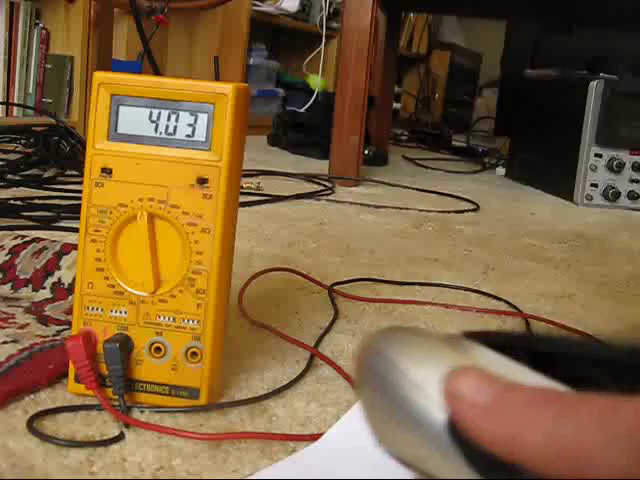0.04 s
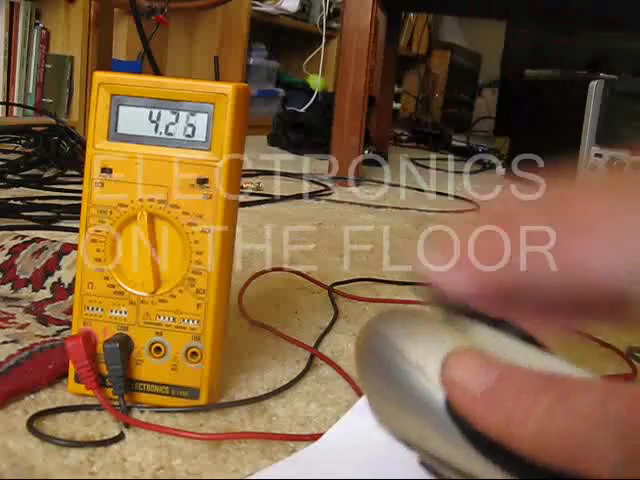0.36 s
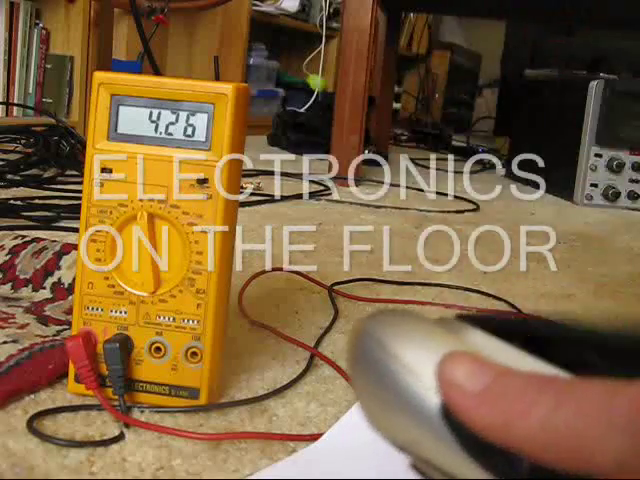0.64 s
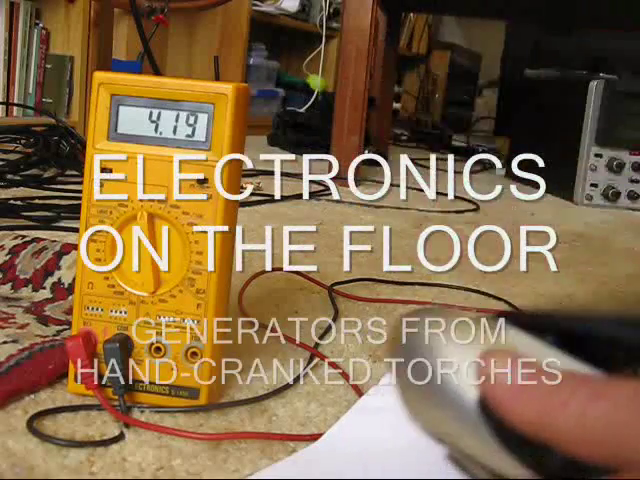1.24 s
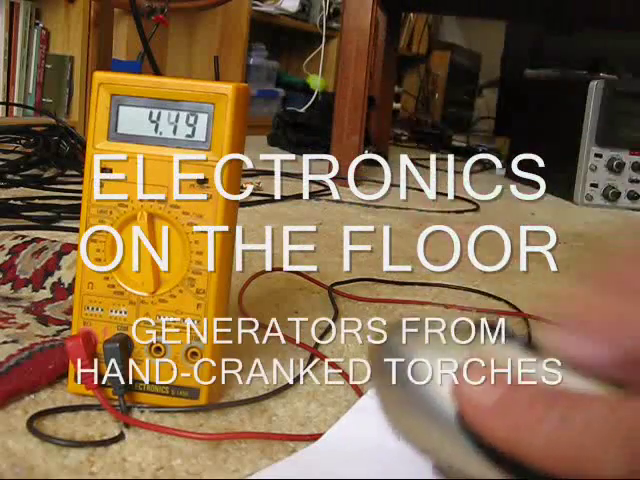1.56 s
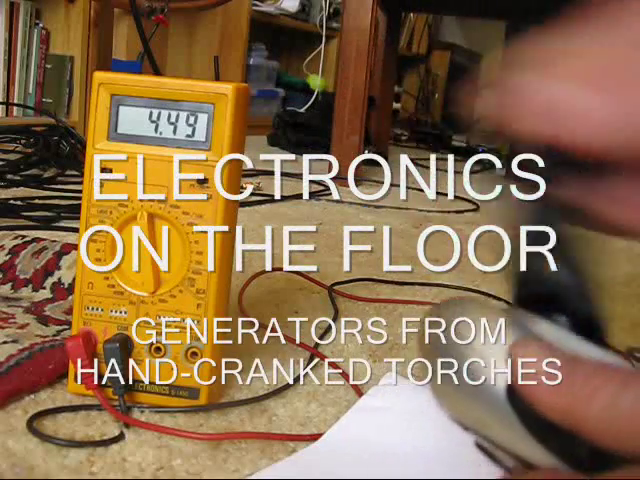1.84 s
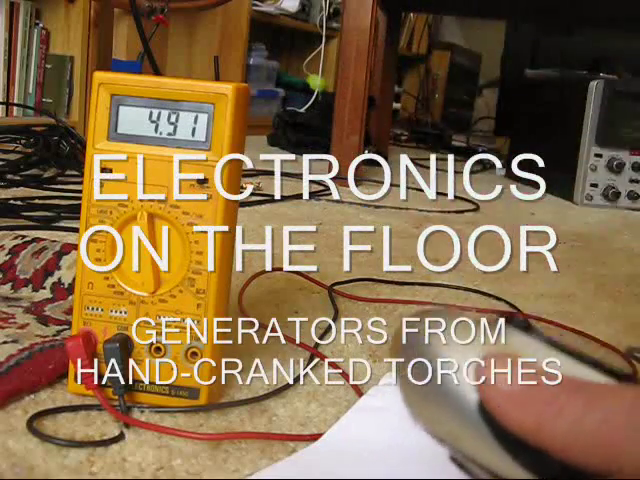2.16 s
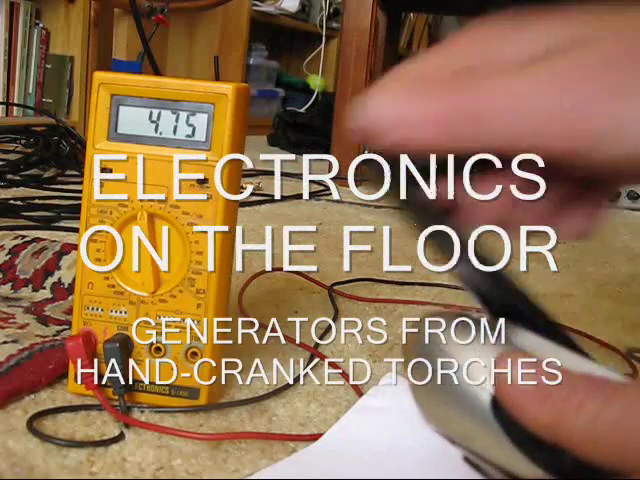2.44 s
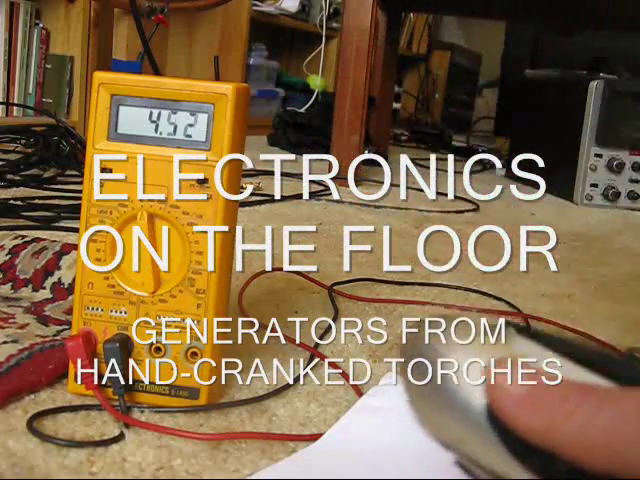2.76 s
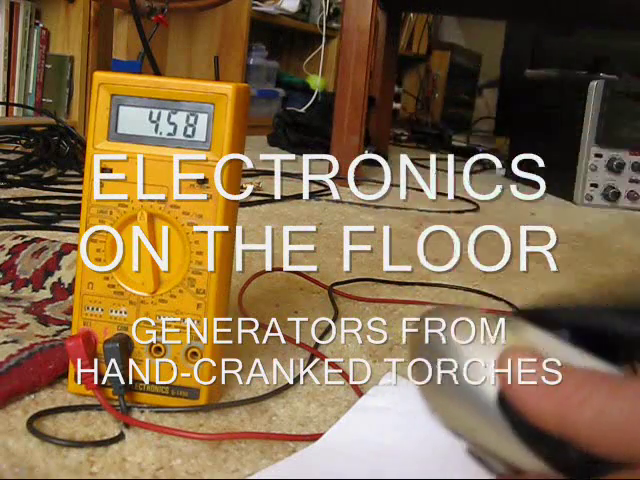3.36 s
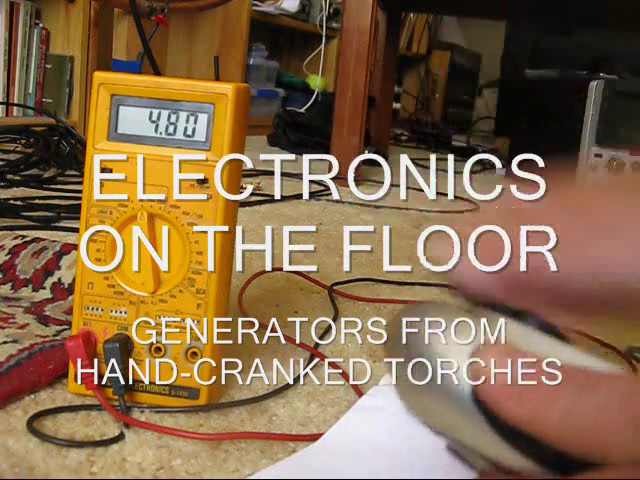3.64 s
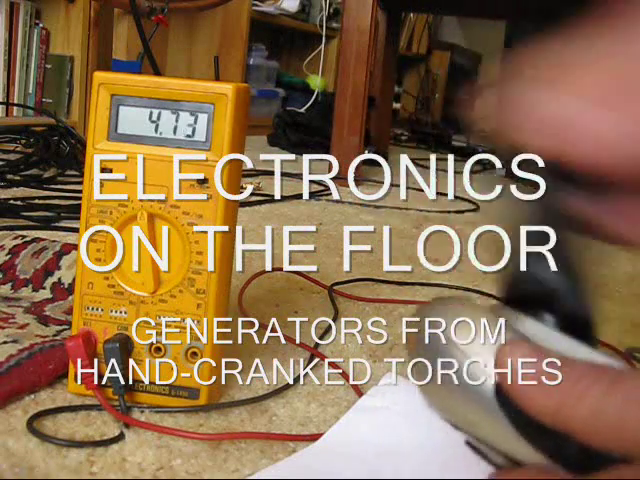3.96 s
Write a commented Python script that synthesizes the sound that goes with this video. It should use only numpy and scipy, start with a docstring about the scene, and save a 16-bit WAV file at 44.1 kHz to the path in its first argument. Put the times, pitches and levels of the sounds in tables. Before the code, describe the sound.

A hand-cranked torch being wound, its plastic gears whirring with a wavering whine.

```python
"""A hand-cranked torch is wound indoors, close to a small camera, about two turns a second.
At 0.13 s it cuts in at full swing: plastic gears whine and chatter through the case over a low grind.
From then on the pitch sags once per crank turn, and the slack gears rattle and scrape as they slow.
Tooth snaps, dry squeals and soft bumps in the hand come now and then to the end, over a faint hum.
Throughout, the camera samples coarsely and holds each sample, mirroring the whirr into the treble."""
import sys
import numpy as np
from scipy import signal
from scipy.fft import rfft, irfft, next_fast_len
from scipy.io import wavfile
from scipy.ndimage import uniform_filter1d, map_coordinates

SR = 44100
rng = np.random.default_rng(int(sys.argv[2]) if len(sys.argv) > 2 else 0)


def transcribe(u):
    """Save the signal u as a 16-bit wav file named by the first command-line argument.

    u: samples, shape (n,) or (channels, n), limited to [-1, 1]; the rate is SR.
    q: integer samples, one column per channel.
    """
    v = np.clip(np.atleast_2d(u).T, -1, 1)
    q = np.round(v * 32767).astype(np.int16)
    wavfile.write(sys.argv[1], SR, q)


N = 176400
WHINE_ORDER, PINION_TEETH, WHEEL_TEETH, WHEEL_PINION_TEETH = 16, 8, 43, 12

# Whine pitch, 16 x dynamo rotor rate: t/s, f/Hz
WHINE_PITCH = [(0.12, 2500), (0.207, 2158), (0.339, 2598), (0.428, 2685), (0.503, 2553), (0.617, 2641),
               (0.677, 2720), (0.736, 2386), (0.823, 2117), (0.907, 2523), (1.02, 2770), (1.125, 2655),
               (1.248, 2866), (1.283, 2864), (1.325, 2642), (1.414, 2543), (1.509, 2988), (1.601, 3154),
               (1.683, 2994), (1.784, 3147), (1.837, 2814), (1.878, 2533), (1.996, 2819), (2.055, 3038),
               (2.215, 2897), (2.3, 3129), (2.343, 2887), (2.399, 2442), (2.531, 2790), (2.618, 2992),
               (2.724, 2824), (2.783, 2993), (2.83, 3136), (2.904, 2721), (2.946, 2434), (3.06, 2780),
               (3.166, 3087), (3.254, 2909), (3.36, 3035), (3.42, 2755), (3.517, 2470), (3.61, 2947),
               (3.665, 3162), (3.767, 2786), (3.838, 2829), (3.941, 2860), (4.0, 2476)]
def gear_train():
    """One speed drives every gear; rotor and wheel angles in turns."""
    whine_hz = glide(WHINE_PITCH)
    rotor = np.cumsum(whine_hz) / SR / WHINE_ORDER
    wheel = rotor * PINION_TEETH / WHEEL_TEETH
    return whine_hz, rotor, wheel


# Main whine envelope: t/s, level/dB
WHINE_LEVEL = [(0.13, -34.5), (0.31, -30), (0.37, -35.5), (0.52, -27.5), (0.69, -39.7), (0.76, -30.4),
               (0.82, -37), (0.91, -30.5), (0.97, -42), (1.2, -30), (1.32, -39.7), (1.35, -28), (1.47, -42),
               (1.5, -28), (1.58, -36.5), (1.63, -54), (1.71, -29), (1.83, -37), (1.9, -29.5),
               (1.98, -35.5), (2.13, -42), (2.24, -30.5), (2.36, -39), (2.41, -28.5), (2.46, -30.5),
               (2.54, -36), (2.65, -42), (2.69, -36.5), (2.87, -32.5), (2.91, -41), (2.96, -26.5),
               (3.07, -39), (3.2, -40), (3.32, -31), (3.42, -40), (3.47, -30.5), (3.52, -29), (3.58, -40),
               (3.62, -31), (3.7, -35.5), (3.73, -47), (3.77, -33.5), (3.88, -35.5), (3.97, -41.2)]
def main_whine(rotor, whine_hz):
    """Whine roughened by uneven teeth, with a side tone below and an overtone that flares in the case."""
    def partial(order, jitter_rad):
        gain = amp(1.1 * wobble(rate_hz=130))
        return unit(gain * np.sin(2 * np.pi * order * rotor + jitter_rad * wobble(rate_hz=400)))

    upper_order = 3 * PINION_TEETH
    flare = resonance(whine_hz * upper_order / WHINE_ORDER, centre_hz=3750, half_width_hz=170)
    voice = partial(WHINE_ORDER, jitter_rad=0.3)
    voice += amp(-7) * partial(WHINE_ORDER - 1, jitter_rad=0.3)
    voice += amp(-8.5) * flare * partial(upper_order, jitter_rad=1.1)
    return amp(curve(WHINE_LEVEL) - 0.2 + 1.3 * wobble(rate_hz=40)) * voice


# Mesh envelope, set by the push on the crank: t/s, level/dB
LOAD = [(0.14, -32.5), (0.29, -24), (0.36, -31.5), (0.48, -25.5), (0.53, -29.5), (0.84, -32.5), (0.9, -26),
        (1.42, -31), (1.45, -28), (1.55, -29), (1.74, -26.5), (1.79, -31.0), (1.98, -28.5), (2.03, -29.5),
        (2.13, -24.5), (2.2, -30.5), (2.27, -27), (2.32, -33), (2.48, -29), (3.18, -30), (3.22, -27),
        (3.7, -32), (3.76, -28), (3.99, -31)]
# Dynamo shaft tones: multiple of shaft rate, level/dB
ROTOR_TONES = {6: -8, 7: -9, 10: -7, 11: -10, 15: -1, 17: -8, 19: -9}
# Driving wheel tones: multiple of shaft rate, level/dB
WHEEL_TONES = {36: -9, 42: -9, 50: -9, 58: -11, 62: -8, 64: -6, 68: -7, 72: -3, 74: -3, 92: -8}
# Plastic case response: f/Hz, level/dB
CASE_RESPONSE = [(100, -28.5), (800, -20), (1050, -11), (1190, -8.5), (1280, -6.5), (1380, -9.5),
                 (1530, -5.5), (1800, -6.5), (2100, -7.5), (2300, -3), (2520, 0.5), (2680, -6.5),
                 (2950, -3), (3200, -4), (3500, -9.5), (4200, -10.5), (5500, -10.5), (7000, -58)]
def gear_mesh(rotor, wheel):
    """Shaft tones, tooth contacts and rubbing, all ringing in the case."""
    tones = shaft_tones(rotor, ROTOR_TONES) + shaft_tones(wheel, WHEEL_TONES)
    teeth = tooth_clicks(wheel, WHEEL_TEETH, scatter_db=5, jitter_s=95e-6)
    mesh = amp(-4.5) * colour(tones, CASE_RESPONSE)
    mesh += amp(-6) * colour(teeth, CASE_RESPONSE)
    mesh += amp(-6.5) * colour(rubbing(rotor, depth=0.53), CASE_RESPONSE)
    return amp(curve(LOAD)) * mesh


def shaft_tones(turns, orders, flutter_db=3):
    """Multiples of a shaft's rate, each fluttering in level."""
    return sum(amp(db + flutter_db * wobble(rate_hz=50)) * np.sin(2 * np.pi * (k * turns + rng.random()))
               for k, db in orders.items())


def tooth_clicks(turns, teeth, scatter_db, jitter_s, uneven_db=2.5):
    """One click per contact: each tooth has its own strength, each contact random level and timing."""
    contact = np.arange(1, int(turns[-1] * teeth))
    strength = rng.standard_normal(teeth)
    timing, force = rng.standard_normal((len(contact), 2)).T
    due = np.interp(contact / teeth, turns, np.arange(N))
    at = np.clip(due + jitter_s * SR * timing, 0, N - 2)
    tooth_db = uneven_db * unit(strength - strength.mean())
    gain = amp(tooth_db[contact % teeth] + scatter_db * np.clip(force, -2, 2))
    i = at.astype(int)  # each click is split over two samples
    return unit(np.bincount(i, gain * (1 - at + i), N) + np.bincount(i + 1, gain * (at - i), N))


def rubbing(turns, depth):
    """Friction noise, swelling once per shaft turn."""
    return rng.standard_normal(N) * np.exp(depth * np.cos(2 * np.pi * turns))


def chatter(rotor, wheel, click_gain):
    """Clicks of the slower gear stage plus rotor friction."""
    teeth = tooth_clicks(wheel, WHEEL_PINION_TEETH, scatter_db=4.6, jitter_s=306e-6)
    return click_gain * teeth + unit(rubbing(rotor, depth=0.3))


# Scrape envelope: t/s, level/dB
SCRAPE_LEVEL = [(0.14, -27), (0.2, -37), (0.28, -31.5), (0.37, -34), (0.74, -28), (0.8, -36.5),
                (0.98, -30.5), (1.05, -40), (1.16, -31), (1.22, -35), (1.33, -29.5), (1.61, -37),
                (1.66, -33.5), (1.89, -28.5), (2.04, -34), (2.18, -31), (2.26, -33.5), (2.4, -27),
                (2.5, -32.5), (2.81, -35), (2.84, -29), (2.96, -31), (3.02, -34), (3.17, -33.5),
                (3.48, -29.5), (3.6, -36.5), (3.75, -38.5), (3.8, -28), (3.88, -38.5), (3.99, -26.5)]
# Scrape spectrum: f/Hz, level/dB
SCRAPE_SPECTRUM = [(300, -33), (1500, -11.5), (3000, -7.5), (4450, -3.5), (4700, 4.5), (4950, 0), (5450, 2),
                   (5800, -2.5), (6200, -52)]
def scrape(rotor, wheel):
    """Treble scraping of the gears, strongest as they slow."""
    gain = amp(curve(SCRAPE_LEVEL) - 0.37)
    return gain * colour(chatter(rotor, wheel, click_gain=0.58), SCRAPE_SPECTRUM)


# Rattle spectrum: f/Hz, level/dB
RATTLE_SPECTRUM = [(300, -29), (1000, -18), (2400, -6), (3050, -6), (3420, 6), (3600, 0.5), (3780, 2.5),
                   (4200, -4), (5500, -11), (7000, -63)]
def rattle(rotor, wheel, whine_hz, db_per_octave=-25.5):
    """Slack gears rattle in their play at the slow part of each turn."""
    mean_hz = uniform_filter1d(whine_hz, size=SR // 2)
    slack_db = -34.5 + db_per_octave * np.log2(whine_hz / mean_hz)
    return amp(slack_db) * colour(chatter(rotor, wheel, click_gain=0.8), RATTLE_SPECTRUM)


def low_whine(turns, order):
    """A lower gear tone; grows with the push and blooms in the case's lowest resonance."""
    hz = order * np.gradient(turns) * SR
    ring_db = 6.5 * resonance(hz, centre_hz=1286, half_width_hz=29)
    load_db = curve(LOAD)
    push_db = 0.7 * (load_db - load_db.mean())
    gain = amp(-43.5 + ring_db + push_db + 1.73 * wobble(rate_hz=35))
    return gain * unit(np.sin(2 * np.pi * order * turns + 0.24 * wobble(rate_hz=120)))


# Tooth snaps: t/s, peak level/dB
SNAPS = [(0.223, -15), (.7216, -18), (.7835, -14), (1.377, -15), (1.8264, -14), (2.3833, -16),
         (3.4489, -17)]
# Snap spectrum: f/Hz, level/dB
SNAP_SPECTRUM = [(500, -20), (3500, -2), (5500, 1), (6500, -46)]
def snaps():
    """Single teeth snap hard against the next."""
    blows = np.zeros(N)
    for at_s, db in SNAPS:
        blows[round(at_s * SR)] = amp(db)
    clicks = colour(blows, SNAP_SPECTRUM)
    return clicks * blows.max() / np.abs(clicks).max()


# Squeals: t/s, half length/s, f/Hz, level/dB
SQUEALS = [(0.264, .027, 3550, -35), (.635, .012, 2880, -31), (0.797, .06, 3430, -39),
           (1.16, 0.041, 4730, -36), (1.794, .014, 5400, -32), (1.991, .007, 3050, -29),
           (2.422, 0.034, 4690, -36), (2.86, .025, 5400, -38), (2.96, 0.027, 4700, -34),
           (3.4, .026, 5450, -37)]
def squeals(width_hz=220):
    """Dry plastic rubs; a narrow resonance flares and fades."""
    t = np.arange(N) / SR
    sound = np.zeros(N)
    for at_s, half_s, hz, db in SQUEALS:
        flutter = wobble(width_hz) + 1j * wobble(width_hz)
        ring = unit(np.real(flutter * np.exp(2j * np.pi * hz * t)))
        sound += amp(db) * swell(at_s, half_s) * ring
    return sound


# Grind envelope: t/s, level/dB
GRIND_LEVEL = [(0.14, -48.5), (0.44, -43), (0.51, -47.5), (0.67, -44.5), (0.71, -50), (0.88, -49.5),
               (0.94, -42.5), (1.34, -45.5), (1.39, -55.5), (1.46, -44), (1.93, -47.5), (1.98, -43.5),
               (2.38, -47.5), (2.43, -55), (2.52, -40), (2.64, -47), (2.75, -42), (2.8, -53.5), (2.91, -41),
               (2.96, -53), (3.07, -43), (3.39, -48), (3.44, -42.5), (3.5, -53), (3.57, -45.5), (3.86, -45),
               (3.89, -50.5), (3.99, -44)]
# Grind spectrum: f/Hz, level/dB
GRIND_SPECTRUM = [(20, -4.5), (60, -2.5), (140, -3.5), (220, -0.5), (360, -1.5), (520, 0), (800, -5.5),
                  (1200, -4), (3000, -61.5)]
def grind():
    """Lumpy low noise of the crank."""
    gain = amp(curve(GRIND_LEVEL) + 0.5 + 2.1 * wobble(rate_hz=45))
    return gain * colour(rng.standard_normal(N), GRIND_SPECTRUM)


# Bumps: t/s, level/dB
BUMPS = [(.415, -41.5), (.665, -44), (.94, -45), (1.0, -49), (1.145, -45), (1.205, -44.5), (1.475, -47),
         (1.985, -45), (2.52, -52), (3.07, -46), (3.815, -43), (3.97, -43.5)]
# Bump spectrum: f/Hz, level/dB
BUMP_SPECTRUM = [(20, -12), (50, 4.5), (110, -4), (250, -5.5), (600, -14.5), (2000, -48)]
def bumps():
    """Short dull swells as the torch rocks in the hand."""
    envelope = sum(amp(db) * swell(at_s, half_s=0.019) for at_s, db in BUMPS)
    return envelope * colour(rng.standard_normal(N), BUMP_SPECTRUM)


def hum(hz, db):
    """Faint steady tone."""
    return amp(db) * unit(np.sin(2 * np.pi * hz * np.arange(N) / SR))


def room(x, t60_s, wet_db):
    """Adds the short tail of a carpeted room."""
    t = np.arange(SR // 3) / SR
    tail = rng.standard_normal(len(t)) * np.exp(-np.log(1000) * t / t60_s)
    return x + amp(wet_db) * signal.fftconvolve(x, tail / np.linalg.norm(tail))[:N]


def amp(db):
    """dB to gain."""
    return 10 ** (np.asarray(db) / 20)


def unit(x):
    """Scaled to rms 1."""
    return x / np.sqrt(np.mean(x ** 2) + 1e-20)


def curve(rows):
    """Straight lines through (t/s, value) rows."""
    return np.interp(np.arange(N) / SR, *np.transpose(rows))


def glide(rows):
    """Natural cubic spline through (t/s, value) rows."""
    knots_s, values = np.transpose(rows)
    basis = lambda t: np.c_[np.abs(t[:, None] - knots_s) ** 3, np.ones(len(t)), t]
    system = np.vstack([basis(knots_s), np.r_[np.ones(len(knots_s)), 0, 0], np.r_[knots_s, 0, 0]])
    weights = np.linalg.solve(system, np.r_[values, 0, 0])
    t = np.linspace(knots_s[0], knots_s[-1], N // 20)
    return curve(np.c_[t, basis(t) @ weights])


def wobble(rate_hz):
    """Smooth random curve, rate_hz knots a second."""
    knots = rng.standard_normal(int(N * rate_hz / SR) + 4)
    return map_coordinates(knots, [np.arange(N) * rate_hz / SR])


def swell(at_s, half_s):
    """Gaussian envelope, peak 1."""
    return np.exp(-((np.arange(N) / SR - at_s) / half_s) ** 2)


def resonance(hz, centre_hz, half_width_hz):
    """Excitation of a resonance by a tone at hz, 0-1."""
    return 1 / (1 + ((hz - centre_hz) / half_width_hz) ** 2)


def colour(x, spectrum):
    """Minimum-phase filter through (f/Hz, level/dB) rows; output rms 1."""
    size = 2 * next_fast_len(N // 2 + 4096)
    hz, db = np.transpose(spectrum)
    gain = amp(np.interp(np.log(np.fft.rfftfreq(size, 1 / SR) + 1), np.log(hz), db))
    cepstrum = irfft(np.log(gain))
    cepstrum[1:size // 2] *= 2
    cepstrum[size // 2 + 1:] = 0
    return unit(irfft(rfft(x, size) * np.exp(rfft(cepstrum)))[:N])


def low_pass(x, hz):
    """Steep edge at hz."""
    size = next_fast_len(N + SR // 2)
    edge = .5 - .5 * np.tanh((np.fft.rfftfreq(size, 1 / SR) - hz) / 60)
    return irfft(rfft(x, size) * np.sqrt(edge), size)[..., :N]


def scene(start_s=0.1283):
    """Torch in the room plus hum, cutting in at full swing; mono."""
    whine_hz, rotor, wheel = gear_train()
    torch = main_whine(rotor, whine_hz)
    torch += low_whine(rotor, order=PINION_TEETH) + low_whine(wheel, order=48)
    torch += gear_mesh(rotor, wheel) + rattle(rotor, wheel, whine_hz) + scrape(rotor, wheel)
    torch += snaps() + squeals() + grind() + bumps()
    mix = room(torch, t60_s=0.25, wet_db=-14) + hum(hz=686, db=-62)
    return (mix * (np.arange(N) / SR > start_s))[None]


def record(dry, hold_samples=4):
    """The camera holds every fourth sample, mirroring the sound into the treble up to its band limit."""
    coarse = low_pass(dry, hz=SR / hold_samples / 2)[:, ::hold_samples]
    held = np.repeat(coarse, hold_samples, axis=1)[:, :N]
    return low_pass(held, hz=15750)


dry = scene()
out = record(dry)
transcribe(out)
```